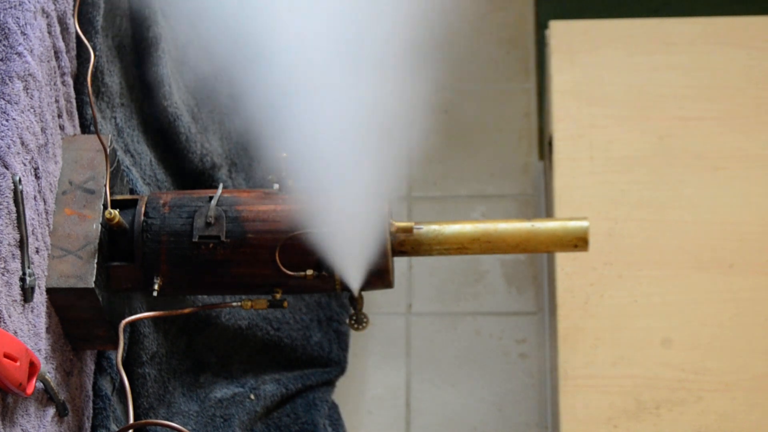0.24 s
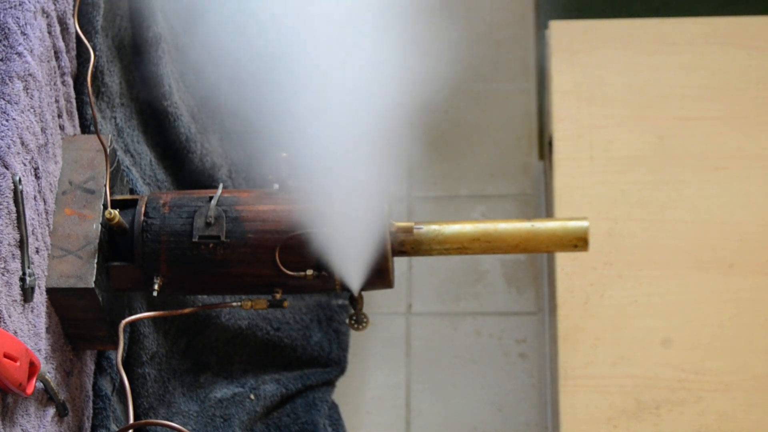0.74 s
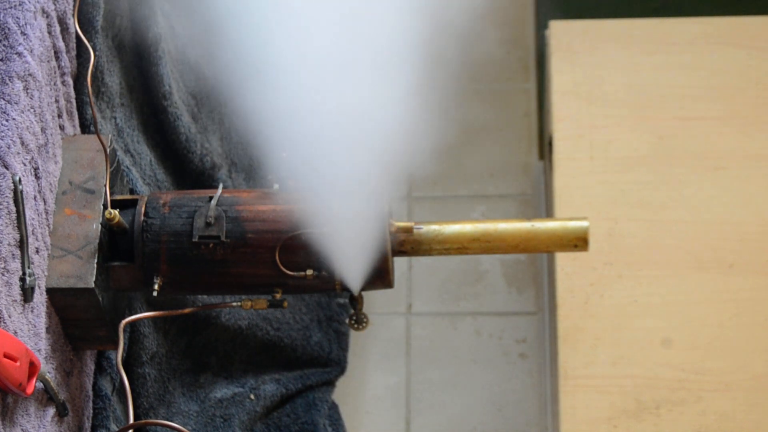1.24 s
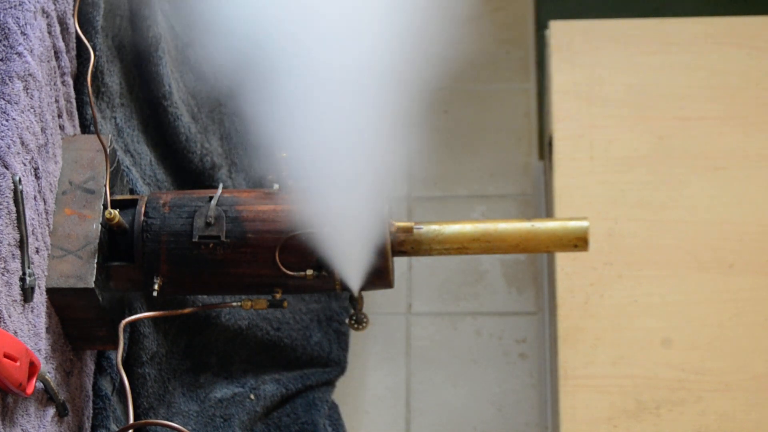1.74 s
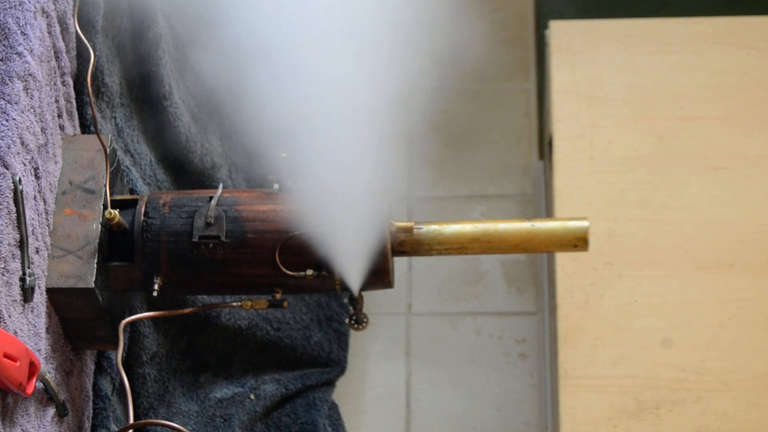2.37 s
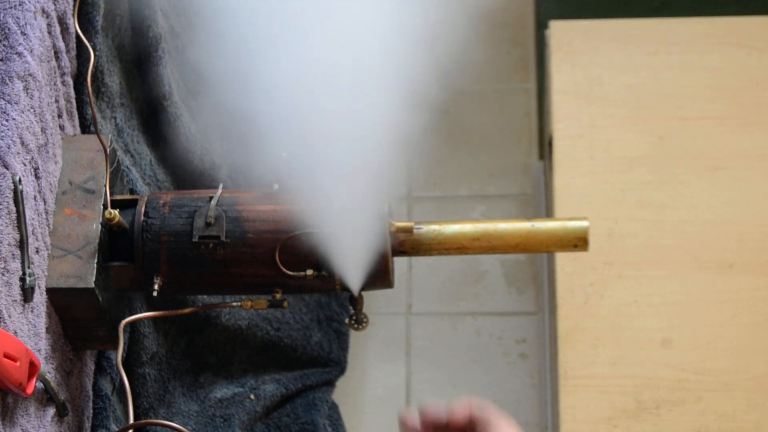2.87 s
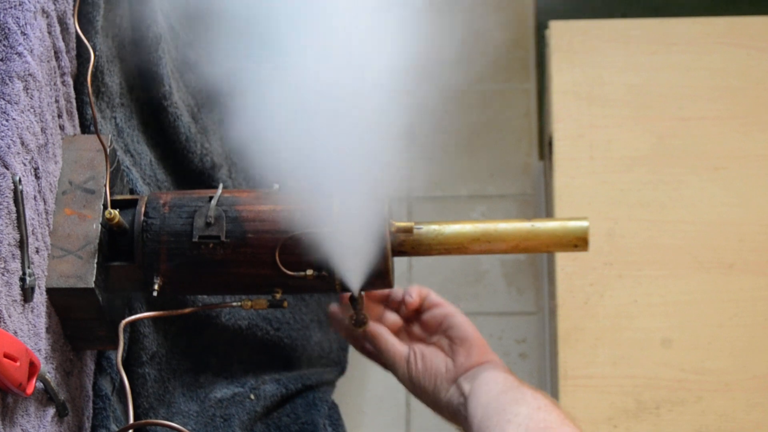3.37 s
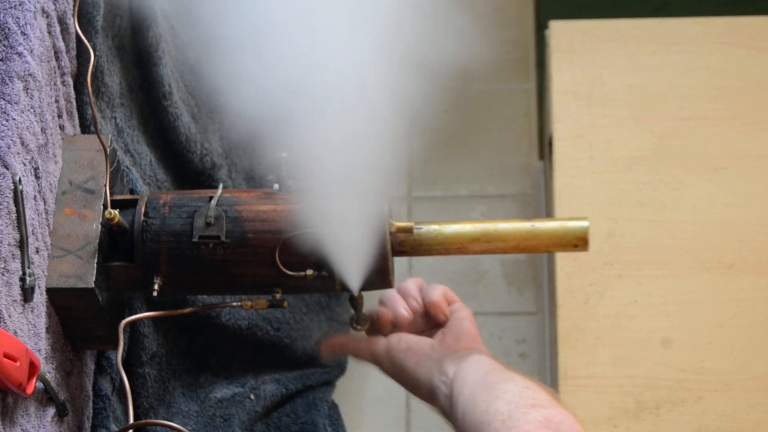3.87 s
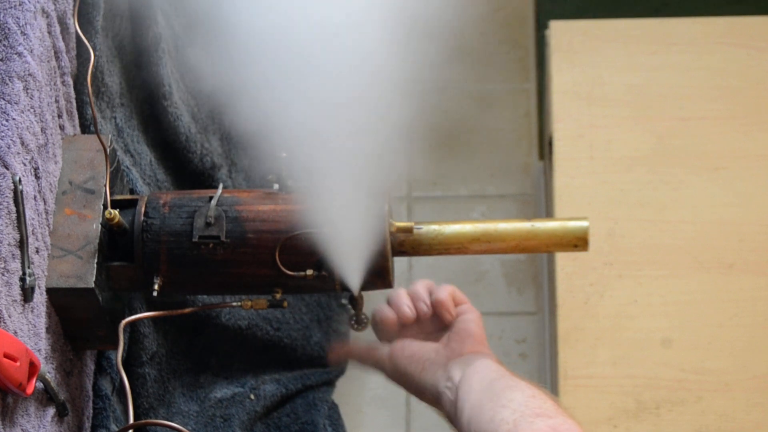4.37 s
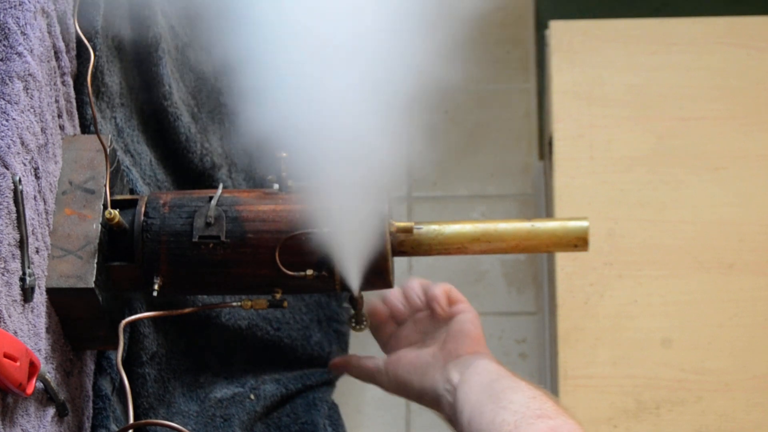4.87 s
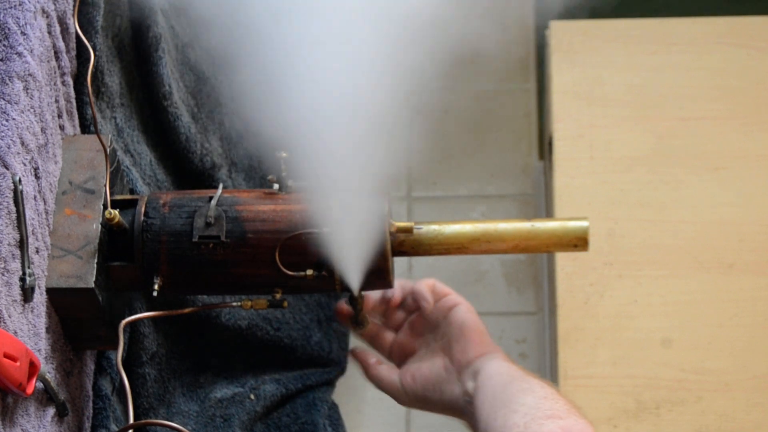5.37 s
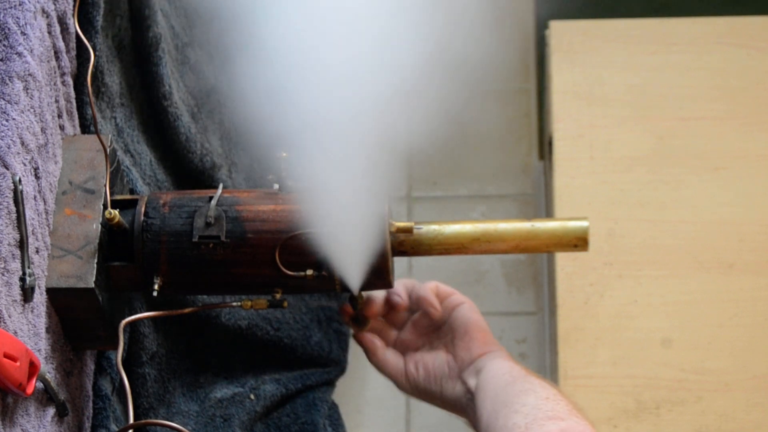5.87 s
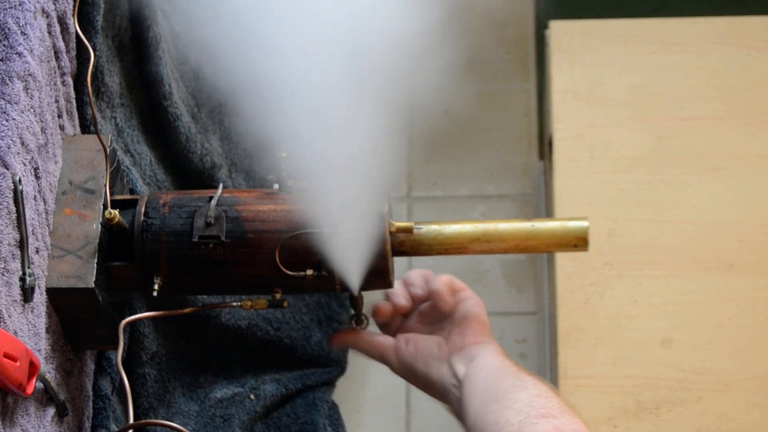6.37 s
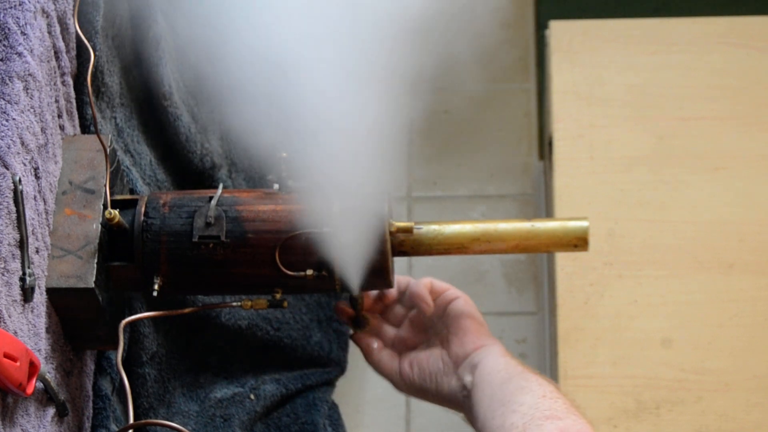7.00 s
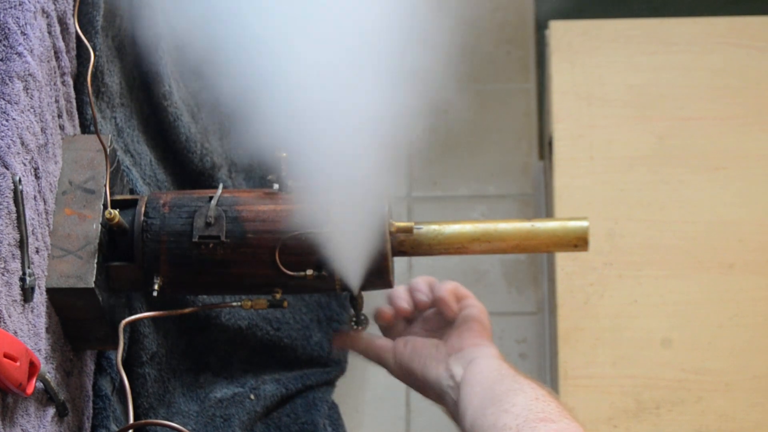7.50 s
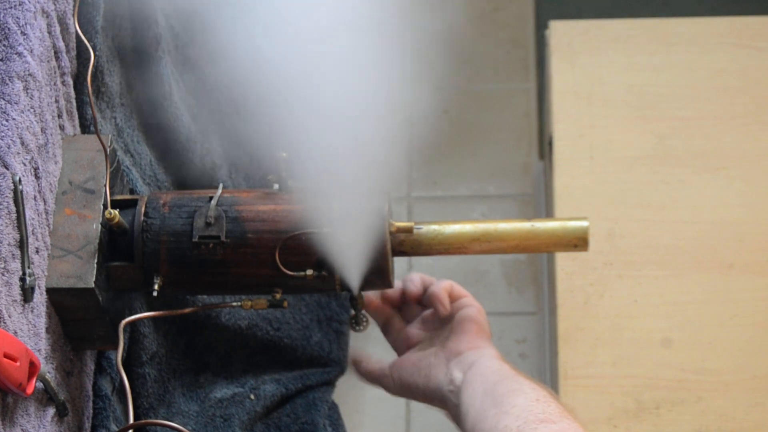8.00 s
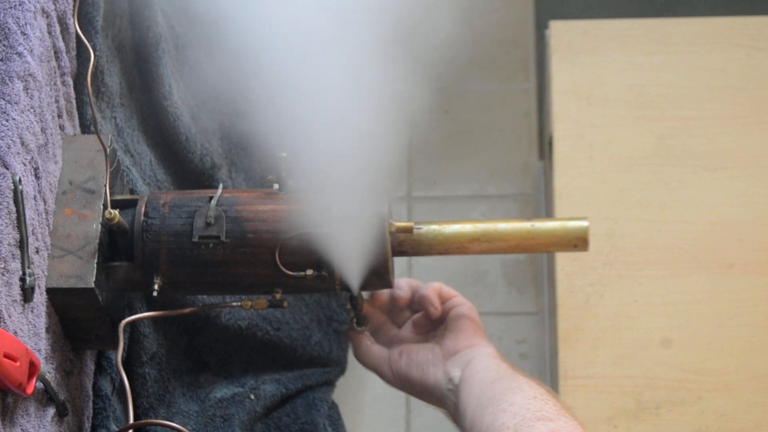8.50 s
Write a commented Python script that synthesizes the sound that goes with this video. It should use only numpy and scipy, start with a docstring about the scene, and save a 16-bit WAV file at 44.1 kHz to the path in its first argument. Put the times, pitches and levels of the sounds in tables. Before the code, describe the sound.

Close indoors, a small boiler's open valve roars pressurised steam continuously, fizzing harshly, flickering with short chokes and surges and faint water sputter.

```python
"""Steam from a model boiler valve

Indoors, with the microphone close, steam blows hard from the open valve of a small model boiler: shaped noise.
Now and then water chokes the fizzing jet and a drier, fuller surge follows, more often once a hand
works the wheel. Resonances and dense reflections from nearby surfaces colour the hiss, level curves
move the plume's faint rumble, and filtered clicks make the spitting drops of water."""
import sys
import numpy as np
from scipy import signal
from scipy.fft import rfft, irfft, next_fast_len
from scipy.io import wavfile
from scipy.ndimage import uniform_filter1d

SR = 44100
rng = np.random.default_rng(int(sys.argv[2]) if len(sys.argv) > 2 else 0)


def dump_mix(stems):
    """Bounce the given channels to the path in sys.argv[1] as a 16-bit WAV at rate SR."""
    frames = np.atleast_2d(stems).T  # one column per channel
    limited = np.clip(frames, -1, 1)  # hard clip at full scale
    pcm = np.round(limited * 32767).astype(np.int16)
    wavfile.write(sys.argv[1], SR, pcm)


N = 385423  # length in samples

# Narrow resonances of the valve and its surroundings.
# Each row: centre in Hz, full width at half lift in Hz, lift in dB before the common depth factor.
RESONANCES = [(253, 32, 3.3), (339, 48, 3.9), (392, 27, 4.4), (516, 53, 3.6), (597, 44, 2.7),
              (742, 18, 2.6), (1060, 47, 2.5), (1270, 34, 2.8), (1469, 24, 3.4), (1577, 41, 2.8),
              (2406, 42, 3.8), (3343, 35, 2.9), (3466, 35, 3.1), (3972, 42, 4.5), (4904, 42, 4.1),
              (5114, 19, 3.8), (5749, 30, 3.4), (5792, 23, 3.9), (6013, 52, 3.2), (6196, 26, 3.7),
              (7127, 62, 4.9), (7283, 33, 4.8), (7547, 50, 3.0), (8112, 49, 3.6), (8306, 44, 4.4),
              (8510, 40, 3.8), (9151, 45, 4.9), (9668, 29, 3.7), (9926, 42, 3.7), (10508, 48, 5.5)]

# Large drops of water spat out with the steam.
# Each row: time in seconds, level in dB before the common spit lift and the band filter.
LARGE_SPITS = [(2.859, -23), (3.109, -24), (3.424, -26), (3.544, -19.5), (3.654, -31), (5.079, -25),
               (6.299, -27), (8.109, -32)]

# Mean colour of the jet. Each row: frequency in Hz, relative density in dB per Hz.
JET_COLOUR = [(25, -43), (60, -34), (100, -28.5), (175, -22.5), (280, -17), (550, -11), (1000, -8),
              (1400, -5.5), (2700, -4.5), (3300, -2.5), (7000, -1.5), (8400, -2), (9200, 1.5),
              (10000, -1.53)]

# Surges: as most begin, water chokes the valve for an instant, then drier steam roars through.
# Each row: start in seconds, length in seconds, strength in dB, choke in dB (negative: a slight lift),
# strongest band in Hz. The reach tables below share the strength and the choke out over the spectrum.
SURGE_EVENTS = [(.49, 0.21, 2.5, 2.5, 3600), (1.558, .2, 3.5, 1, 1450), (2.265, 0.18, 2.5, 0.5, 1400),
                (2.705, .17, 2, 1.6, 1400), (3.79, .13, 1.3, -0.5, 1450), (4.235, 0.091, 2, 1, 1500),
                (4.538, .15, 2.5, 1.5, 3500), (4.895, 0.16, 3, 1.5, 3600), (5.24, 0.27, 1.7, 1.5, 3500),
                (5.677, 0.15, 2.7, 2.5, 3600), (6.036, 0.19, 3, 4, 3700), (6.415, .04, 3, 1, 3500),
                (6.594, .11, 2.6, 1.8, 3000), (6.845, .07, 3.5, 3, 3500), (7.06, 0.22, 4.5, 6, 3600),
                (7.695, .07, 5.5, .4, 1500), (7.957, 0.086, 2, 1.9, 3800), (8.263, 0.32, 2.5, 3, 1350),
                (8.588, .06, 2.5, 1.2, 3500), (8.72, .1, 5, 2, 1500)]

# Narrow bands of the hiss that briefly rise or sink.
# Each row: centre in seconds, half length in seconds (to 1/e), frequency in Hz, lift in dB (negative: a dip).
BRIEF_BANDS = [(.85, .16, 9930, 6), (3.1, .12, 2730, 7.5), (3.46, 0.26, 3170, 7.5), (7.2, 0.13, 4050, -1),
               (7.2, 0.15, 2850, 5), (7.43, .16, 9900, 4)]

# Level of the plume's roar, mostly slow, with an abrupt rise near 3.8 s.
# Each row: time in seconds, control in dB before its reach.
ROAR_LEVEL = [(0.0, 2.5), (0.35, 2.2), (1.0, 1.4), (1.5, 0), (2.1, 1.9), (2.65, -0.8), (2.95, 1.3),
              (3.22, -3.5), (3.4, 0.1), (3.77, -5), (3.82, 0.5), (4.4, 1.5), (6.9, 2.05), (7.3, 1.7),
              (7.5, 1), (8.15, 0.5), (8.4, 2.2), (8.74, -1.5)]
# Slow drift of the amount of spray in the jet. Each row: time in seconds, control in dB before its reach.
SPRAY_DRIFT = [(0.0, -0.7), (1.3, 0.5), (2.6, 0.2), (3.7, 0.0), (4.6, -0.9), (6.2, -0.8), (7.45, -0.8),
               (8.1, -2.5), (8.74, 0)]

# How far each part of the spectrum follows the roar, the surges, the chokes and the spray.
# Each row: frequency in Hz, share of the control (a ratio; negative moves the opposite way).
ROAR_SHARE = [(90, 1.1), (210, 1.5), (800, 1), (1400, 0.87), (2200, 0.63), (3500, .22), (5000, 0.036)]
SURGE_SHARE = [(90, -3.5), (210, -0.6), (400, 0.17), (1050, .5), (1400, 0.87), (2000, 0.78), (3500, .5),
               (5000, .2), (6600, 0), (8200, -0.8), (10000, -1)]
CHOKE_SHARE = [(90, -0.84), (800, -1.56), (1400, -1.3), (2200, -0.52), (5000, -0.78), (10000, -0.37)]
SPRAY_SHARE = [(90, 1.2), (400, -0.15), (2000, 0.49), (3500, -0.75), (6600, -0.31), (10000, 0.48)]

# Top end of the microphone's response. Each row: frequency in Hz, response in dB.
MICROPHONE_TOP = [(10000, 0), (10500, -4), (11000, -10.5), (11500, -22), (12050, -52), (12400, -35),
                  (12850, -29.5), (13500, -41)]

JET_DB = -17  # rms of the steam with its reflections, ahead of the microphone
CLEAR_S, REWET_S = 0.043, 0.17  # a surge opens quickly, the spray returns slowly
CHOKE_S = 0.041  # half length of a choke, to 1/e
SURGE_BAND_SHARE, SURGE_BAND_OCTAVES = 0.48, 0.35  # each surge lifts its own band further; half width to 1/e
BRIEF_BAND_WIDTH_HZ = 55  # half width, to 1/e
EDGE_HZ = 13600  # upper band limit
FRAME, HOP = 1024, 256  # samples per spectral frame and between frames


def gain_of(db):
    """Decibels to amplitude."""
    return 10 ** (np.asarray(db) / 20)


def evened(x):
    """Scales to an rms of one."""
    return x / np.sqrt(np.mean(x ** 2) + 1e-20)


def read(points, hz):
    """Reads a table on a log-frequency axis."""
    f, value = np.transpose(points)
    return np.interp(np.log(hz + 1), np.log(f + 1), value)


def over_time(points, t):
    """Reads a table along time."""
    return np.interp(t, *np.transpose(points))


def filtered(x, curve_db):
    """Filters by a function that gives dB for each frequency."""
    size = next_fast_len(len(x) + 8192)
    gain = gain_of(curve_db(np.fft.rfftfreq(size, 1 / SR)))
    return irfft(rfft(x, size) * gain, size)[:len(x)]


def patches(shape, frames_count, bins_count):
    """Smooth random blotches over time and frequency, with an rms of one."""
    blotches = uniform_filter1d(rng.standard_normal(shape), frames_count, 0)
    return evened(uniform_filter1d(blotches, bins_count, 1))


def echoes(x, t60):
    """Dense reflections of random sign that die away by 60 dB in t60 seconds."""
    t = np.arange(SR // 2) / SR
    struck = rng.standard_normal(len(t)) * (rng.random(len(t)) < 0.1)  # one tap in ten
    taps = struck * (t > 0.001) * gain_of(-60 * t / t60)
    return signal.oaconvolve(x, taps / np.linalg.norm(taps))[:N]


def surroundings(x, room_db=-7, room_t60=0.39, near_db=-14, near_t60=0.1, sway_per_s=1.29, bass_cut_hz=700):
    """Walls answer steadily; the nearby reflections shift as the plume sways and the hand moves."""
    t = np.arange(N) / SR
    # little bass comes back
    thrown = filtered(x, lambda hz: -10 * np.log10(1 + (bass_cut_hz / (hz + 1)) ** 2))
    near = np.zeros(N)
    for place in np.arange(-1, t[-1] * sway_per_s + 1):
        # one set of reflections fades into the next
        presence = np.cos(np.pi / 2 * np.clip(t * sway_per_s - place, -1, 1))
        near += presence * echoes(thrown, near_t60)
    return x + gain_of(room_db) * echoes(thrown, room_t60) + gain_of(near_db) * near


def resonances_db(hz, depth=0.83):
    """Each resonance of the valve and its surroundings lifts a narrow band of the hiss."""
    return depth * sum(db * np.exp(-np.log(2) * (2 * (hz - f) / width) ** 2) for f, width, db in RESONANCES)


def surge_shapes(t):
    """Each surge opens, holds, and fades as the spray returns; one dB curve per surge."""
    shapes = []
    for s, length, db, _, _ in SURGE_EVENTS:
        opening = np.clip((t - s) / CLEAR_S + 0.5, 0, 1)
        fading = np.clip((s + length - t) / REWET_S + 0.5, 0, 1)
        shapes.append(db * opening * fading)
    return shapes


def spatter(spit_db=18, drops_per_s=60, drop_db=-13.5, spread_db=4.0, drying=2.5, low_hz=200, top_hz=1200):
    """Water bursts in dull pops: a few large spits among tiny drops that dry up in the surges."""
    surge = sum(surge_shapes(np.arange(N) / SR))
    # drying is dB lost per dB of surge
    size = gain_of(drop_db - drying * surge + spread_db * np.minimum(rng.exponential(1, N), 3))
    pops = size * rng.choice([-1, 1], N) * (rng.random(N) < drops_per_s / SR)
    for s, db in LARGE_SPITS:
        pops[round(s * SR)] += gain_of(db + spit_db)
    return signal.lfilter(*signal.butter(1, [low_hz, top_hz], "bandpass", fs=SR), pops)


def brief_bands_db(t, hz):
    """Narrow bands of the hiss briefly rise or sink."""
    return sum(db * np.exp(-((t - s) / length) ** 2 - ((hz - f) / BRIEF_BAND_WIDTH_HZ) ** 2)
               for s, length, f, db in BRIEF_BANDS)


def choke_db(t):
    """The flow dips as most surges begin; one starts with a slight lift."""
    return sum(db * np.exp(-((t - s) / CHOKE_S) ** 2) for s, _, _, db, _ in SURGE_EVENTS)


def surge_bands_db(t, hz):
    """Each surge is strongest in one broad band."""
    lift = 0
    for shape, (*_, band_hz) in zip(surge_shapes(t), SURGE_EVENTS):
        octaves = np.log2((hz + 1) / band_hz)
        lift = lift + shape * np.exp(-(octaves / SURGE_BAND_OCTAVES) ** 2)
    return SURGE_BAND_SHARE * lift


def jet(eddy_db=0.5, flutter_db=1.1, flutter_top_hz=2500, dryness_db=0.48, flow_db=0.36):
    """Turbulent noise: wet steam fizzes and rumbles, dry surges fill the middle instead."""
    hz = np.fft.rfftfreq(FRAME, 1 / SR)
    t = np.arange(N // HOP + 5)[:, None] * HOP / SR
    # dryness and flow wander slightly at random throughout
    surge = sum(surge_shapes(t)) + dryness_db * patches(t.shape, frames_count=10, bins_count=1)
    choke = choke_db(t) + flow_db * patches(t.shape, frames_count=8, bins_count=1)
    field_db = read(JET_COLOUR, hz) + surge_bands_db(t, hz) + brief_bands_db(t, hz)
    controls = [(surge, SURGE_SHARE), (choke, CHOKE_SHARE),
                (over_time(ROAR_LEVEL, t), ROAR_SHARE), (over_time(SPRAY_DRIFT, t), SPRAY_SHARE)]
    for control, share in controls:
        field_db += (control - control.mean()) * read(share, hz)  # each control moves about its mean
    # small eddies stir narrow patches; large ones shake the whole lower range together
    field_db += eddy_db * patches(field_db.shape, frames_count=14, bins_count=12)
    flutter = flutter_db * patches(t.shape, frames_count=3, bins_count=1)
    field_db += flutter / (1 + (hz / flutter_top_hz) ** 2)
    noise = rng.standard_normal(field_db.shape) + 1j * rng.standard_normal(field_db.shape)
    spectrum = (noise * gain_of(field_db)).T
    return evened(signal.istft(spectrum, nperseg=FRAME, noverlap=FRAME - HOP)[1][:N])


def scene():
    """The jet in its surroundings with the spitting drops, the same in both channels."""
    hiss = filtered(jet(), resonances_db)
    steam = gain_of(JET_DB) * evened(surroundings(hiss))
    return np.tile(steam + spatter(), (2, 1))


def microphone_db(hz, notch_hz=7930, notch_width_hz=150, notch_db=-9):
    """A narrow dip in the treble and a steep fall at the top."""
    return read(MICROPHONE_TOP, hz) + notch_db / (1 + ((hz - notch_hz) / notch_width_hz) ** 2)


def record(dry, knee_db=-5, split_hz=4000, gain_db=4):
    """The microphone colours the sound and rounds its highest treble peaks; then the band limit."""
    sound = gain_of(gain_db) * filtered(dry.mean(0), microphone_db)

    def treble_db(hz):
        """Keeps the range above the split."""
        return -20 * np.log10(1 + (split_hz / (hz + 1)) ** 4)

    treble = filtered(sound, treble_db)
    envelope = abs(signal.hilbert(treble, next_fast_len(N))[:N])
    drive = envelope / gain_of(knee_db)
    squeeze = treble / (1 + drive ** 4) ** (1 / 4) - treble  # what the rounding takes away
    sound = sound + filtered(squeeze, lambda hz: treble_db(hz) + microphone_db(hz))
    band_limit = signal.firwin(511, EDGE_HZ, window=("kaiser", 9), fs=SR)
    return np.tile(signal.oaconvolve(sound, band_limit, "same"), (2, 1))


dry = scene()
out = record(dry)
dump_mix(out)
```